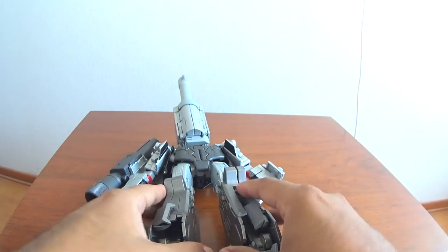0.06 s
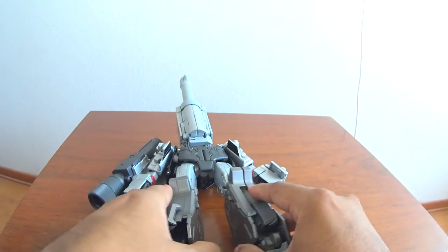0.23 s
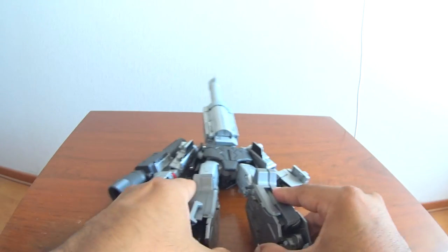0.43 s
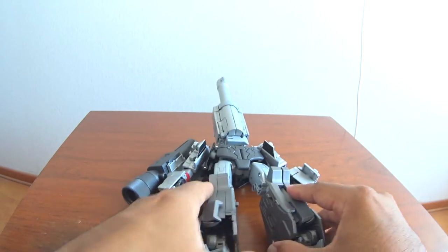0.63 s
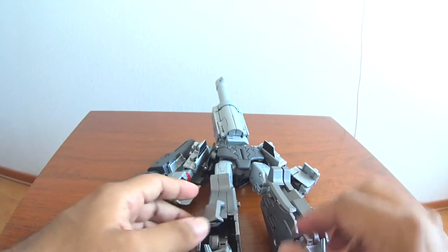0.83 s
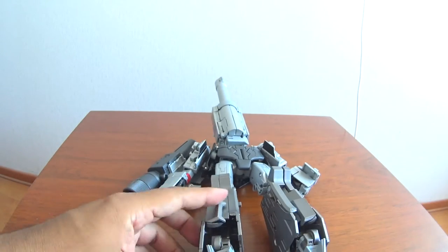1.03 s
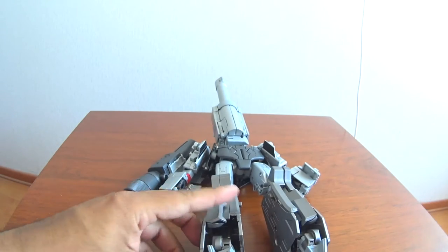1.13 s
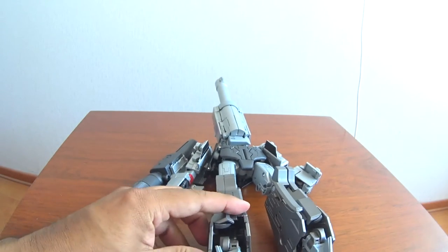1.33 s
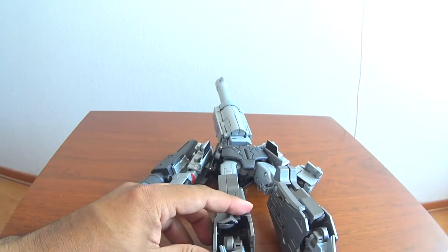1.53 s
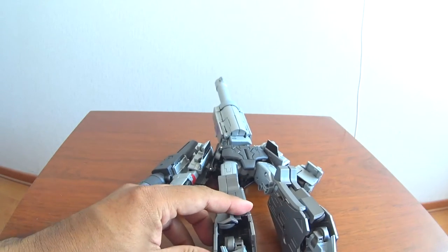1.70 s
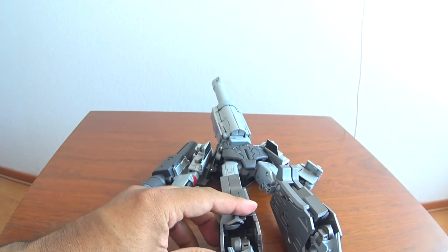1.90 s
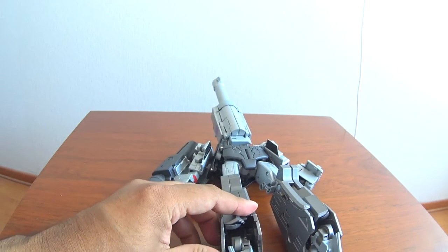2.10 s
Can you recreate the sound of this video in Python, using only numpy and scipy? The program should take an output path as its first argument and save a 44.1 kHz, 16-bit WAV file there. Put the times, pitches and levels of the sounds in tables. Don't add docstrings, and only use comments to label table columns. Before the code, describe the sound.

Hard plastic toy handled on a wooden table, heard close in stereo in a small room. A soft thump and scrape open; from 0.2 to 0.5 seconds bright snaps crowd together, with a loud hollow clack near 0.4 and grainy rubbing. Faint taps follow around 0.6, then near quiet. Crisp folding clicks and table thumps come at 1.2-1.5, sparser ones at 1.7-2.1, over faint hum and hiss.

```python
import sys
import numpy as np
from scipy import signal
from scipy.fft import rfft, irfft
from scipy.io import wavfile

SR = 44100
rng = np.random.default_rng(int(sys.argv[2]) if len(sys.argv) > 2 else 0)


def undo_db(level):
    steps = np.asarray(level, float) / 20
    return 10 ** steps


def inscribe(sig):
    pcm = np.round(np.clip(np.atleast_2d(sig).T, -1, 1) * 32767)
    wavfile.write(sys.argv[1], SR, pcm.astype(np.int16))


N = 94815


def level(x, db):
    return x * undo_db(db) / np.sqrt(np.mean(x ** 2))


def curve(rows):
    times, db = np.array(rows).T
    return undo_db(np.interp(np.arange(N) / SR, times, db))


def plastic(modes, cycles, detune):
    hz, db = np.array(modes).T
    shifted = hz * (1 + detune * rng.standard_normal(len(hz)))
    return np.array([shifted, db, cycles / hz]).T


def lean(modes, centre_hz, octaves):
    distance = np.log2(np.array(modes)[:, 0] / centre_hz)
    return -6 * (distance / octaves) ** 2


def ring(modes, gains_db, size):
    hz, db, t60 = np.array(modes).T[:, :, None]
    t = np.arange(size) / SR
    strength = undo_db(db + np.reshape(gains_db, (-1, 1)))
    decay = np.exp(-np.log(1000) * t / t60)
    return np.sum(strength * np.sin(2 * np.pi * hz * t) * decay, axis=0)


def grains(count, spread_db):
    return rng.standard_normal(count) * undo_db(spread_db * rng.exponential(size=count))


def hit(modes, centre_hz, octaves, chatter_ms, size, rattle_db=-120, blow_db=-120):
    gains = lean(modes, centre_hz, octaves)
    ms = np.arange(size) / SR * 1000
    rattle = undo_db(rattle_db) * np.exp(-ms / 34.5)
    shape = np.exp(-ms / max(chatter_ms, 0.1)) + rattle
    rise = 1 - np.exp(-ms / 0.3)
    push = grains(size, 2.0) * shape * rise
    push[0] = -undo_db(blow_db)
    scatter = 1.5 * rng.standard_normal(len(modes))
    direct = signal.fftconvolve(push, ring(modes, gains + scatter, size=2048))[:size]
    around = ring(modes * [1, 1, 0.5], gains, size)
    same_energy = np.sqrt(np.sum(direct ** 2) / np.sum(around ** 2))
    return np.array([direct, around * same_energy])


def add(track, at_s, sound, peak_db):
    i = int(at_s * SR)
    scaled = sound * undo_db(peak_db) / np.abs(sound[0]).max()
    track[:, i:i + sound.shape[1]] += scaled[:, :N - i]


def highpass(x, order, cut_hz):
    return signal.sosfilt(signal.butter(order, cut_hz, "highpass", fs=SR, output="sos"), x)


SNAP_OCTAVES, SNAP_CUT_HZ, SHELL_CYCLES = 0.9, 1250, 20

# (frequency [Hz], level [dB])
SHELL_MODES = [(1450, -42), (1940, 3.5), (2400, -61), (2850, 4), (3700, 5), (4400, 5.5), (5100, 2),
               (5700, 8.5), (6500, 3.5), (7250, 14), (7900, 15.5), (8600, -34), (9600, -52), (10650, 13)]
# (time [s], peak
# level [dB], colour centre [Hz], chatter [ms])
SHELL_SNAPS = [(0.2093, -27.5, 5840, 1.6), (0.2163, -35, 3900, 2), (0.2259, -24.5, 6400, 1),
               (0.2325, -20, 7100, 2.4), (0.2333, -19, 5000, 0.34), (0.299, -45, 8000, 2.3),
               (0.3078, -18, 5070, 2.8), (0.3365, -16.5, 6040, 5.4), (0.3401, -22, 7000, 2),
               (0.366, -28, 5970, 1.1), (0.3693, -22, 5840, 7.6), (0.378, -19, 7000, 1.6),
               (.3860, -18.5, 6350, 0.63), (0.394, -23.5, 7000, 4.4), (0.402, -26, 7000, 1.6),
               (0.4052, -18, 5000, 2.2), (.4550, -33, 7000, 1.3),
               (1.215, -46, 5000, 4.4), (1.2214, -35.5, 4070, 3.4), (1.2276, -23.5, 8200, 2.2),
                 (1.2323, -34.5, 4530, 1.1), (1.2486, -20.5, 7200, 1.9), (1.3568, -31.5, 5240, 1.9),
                 (1.3810, -30, 4300, 3.6), (1.4283, -26.5, 3548, 2.7), (1.679, -44, 3500, 1.3),
                 (1.7320, -28, 5400, 1.8), (1.814, -40.5, 3900, 9.4), (1.8266, -24, 7740, 2),
                 (1.9686, -39.5, 5000, 1.7), (2.016, -30.5, 5000, 2.5), (2.0535, -39.5, 3560, 1.8),
                 (2.0714, -39, 3500, 1.1), (2.1144, -27.5, 5840, 2.2)]


def snaps():
    out = np.zeros((2, N))
    for s, db, hz, chatter_ms in SHELL_SNAPS:
        shell = plastic(SHELL_MODES, SHELL_CYCLES, detune=0.025)
        add(out, s, hit(shell, hz, SNAP_OCTAVES, chatter_ms, size=2048, blow_db=4), db)
    return highpass(out, 3, SNAP_CUT_HZ)


# (time [s], peak level [dB], panel
# tone [Hz], chatter [ms])
PANEL_TAPS = [(0.043, -49.5, 8300, 6), (0.1226, -43, 2000, 2.65), (0.228, -30.5, 2720, 5.9),
              (.308, -31, 1950, 1.5), (.3078, -27, 5000, 1.5), (0.563, -42, 3440, 5.9),
              (.6365, -39.5, 3700, 2.5), (0.68, -42, 7800, 1.2), (.683, -37, 2060, 2.8),
              (.698, -42, 2770, 0.36), (0.935, -55.5, 8000, 3.6), (1.07, -51, 6600, 2.5),
              (1.2495, -38, 1880, 1.8), (1.2490, -22, 6200, 1.6), (1.431, -29.5, 3370, 2.6),
              (1.736, -44.5, 4100, 1.24), (.210, -63, 2750, 2.5), (0.22, -36, 2800, 2.9),
              (0.4, -44, 4100, 1), (0.3, -35, 10600, 0.89), (.318, -44, 3800, 0.76), (0.57, -53, 2300, 3.2),
              (0.52, -53, 2300, 2), (.625, -41, 4200, 2), (0.63, -47, 3330, 2.2), (1.223, -37.5, 4300, 1.4),
              (1.430, -33, 1440, 4.1), (1.4, -35, 1600, 2.3), (1.452, -43, 4200, 2),
              (1.827, -40, 3100, 1.3), (1.8265, -35.5, 7200, 2.7), (1.836, -41, 6800, 2.4),
              (1.863, -46, 7300, 5.8), (1.972, -48, 1800, 2.86), (2.019, -44, 1710, 2.9),
              (2.0175, -31.5, 5300, 0.88), (2.056, -41.5, 2900, 4), (1.2285, -27, 13000, 1.8),
              (1.249, -38, 17000, 1.3), (1.237, -36, 12000, 1.5), (1.737, -41.5, 2300, 3.7),
              (0.29, -38, 7200, 2), (.2258, -28.5, 5800, 1.5)]


def taps():
    out = np.zeros((2, N))
    for s, db, hz, chatter_ms in PANEL_TAPS:
        panel = plastic([(hz, 0), (hz * 1.17, -3)], SHELL_CYCLES, detune=0)
        add(out, s, hit(panel, hz, SNAP_OCTAVES, chatter_ms, size=2048), db)
    return highpass(out, 3, SNAP_CUT_HZ)


BODY_CYCLES = 19.7

# (frequency [Hz], level [dB])
BODY_MODES = [(376, -33), (460, 1.5), (580, 6), (710, 4.5), (820, 14.5), (976, -2.5), (1025, 9), (1225, 10),
              (1420, 12.5), (1750, 0), (1980, 15.5), (2800, 10)]
# (frequency [Hz], level [dB], t60 [s])
TABLE_MODES = [(62, -45, 0.9), (95.4, -12.5, 1), (119.87, -12.5, 0.63), (176.1, 2, 0.18), (221.8, -4, 0.37),
               (235.7, -3.5, 0.42), (283, -20, 0.26), (348, -15, 0.1)]
# (time [s], body peak [dB], body centre [Hz], table thump peak [dB], thump centre [Hz])
TABLE_KNOCKS = [(0.034, -63, 700, -34, 90), (0.237, -39.5, 890, -29.5, 178), (0.265, -64, 600, -35.5, 182),
                (0.336, -62, 900, -28, 188), (0.3892, -11.5, 1510, -32, 235), (0.406, -30, 840, -31.5, 200),
                (.420, -19, 970, -59, 235), (0.4389, -19.5, 1120, -27.5, 235),
                (0.4471, -30.5, 1430, -26, 235), (0.46, -27, 1300, -31, 235), (.472, -30.5, 900, -30, 235),
                (0.646, -45, 695, -37, 222), (1.237, -35, 699.4, -33.5, 174), (1.407, -44, 600, -36, 210),
                (1.432, -33, 716, -17.5, 165), (1.481, -35, 1050, -51, 200),
                (1.817, -35.5, 425, -25.5, 165), (1.943, -47.5, 530, -40, 200), (2.025, -54, 700, -39, 232)]


def knocks():
    body, table = np.zeros((2, N)), np.zeros((1, N))
    t = np.arange(512) / SR * 1000
    thump_push = t * np.exp(-t)
    for s, db, hz, thump_db, thump_hz in TABLE_KNOCKS:
        modes = plastic(BODY_MODES, BODY_CYCLES, detune=0.005)
        blow = hit(modes, hz, 1.2, 0.23, size=8192, rattle_db=-12.5, blow_db=21)
        blow = signal.lfilter(*signal.butter(2, hz * 3.6, fs=SR), blow)
        add(body, s, blow, db)
        top = ring(TABLE_MODES, lean(TABLE_MODES, thump_hz, 0.63), size=16384)
        add(table, s, signal.fftconvolve(thump_push, top)[None], thump_db)
    return body, highpass(table, 4, 106.4)


# (time [s], peak level [dB], frequency [Hz], t60 [s])
HOLLOW_TONES = [(.391, -34, 1030, 0.12), (0.391, -34, 1410, 0.052), (.408, -37.5, 817, 0.27),
                (0.425, -36.5, 1050, 0.054), (0.439, -36, 987, 0.18), (.441, -35.5, 712, 0.14),
                (.448, -36, 1384, 0.06), (.459, -41.5, 2000, 0.027), (.470, -42.5, 821, 0.17),
                (1.431, -41, 683, 0.046), (1.436, -44.5, 803, 0.11), (1.436, -43, 345, 0.15),
                (1.480, -46, 580, 0.057), (1.480, -53, 1146, 0.043), (1.820, -40.5, 352, 0.096),
                (1.827, -49.5, 1300, .12), (1.945, -50, 632, 0.061)]


def tones():
    out = np.zeros((2, N))
    ms = np.arange(8192) / SR * 1000
    rise = 1 - np.exp(-ms / 0.84)
    for s, db, hz, t60 in HOLLOW_TONES:
        tone = ring([(hz, 0, t60)], 0, size=8192) * rise
        add(out, s, np.tile(tone, (2, 1)), db)
    return out


def rubbed(modes, control, db, gains_db=0):
    response = ring(modes, gains_db, size=16384)
    response = response / np.sqrt(np.sum(response ** 2))
    force = level(grains(N, 3), db) * curve(control)
    return signal.fftconvolve(force, response)[:N]


# (time [s], level [dB])
DRAG_LEVEL = [(0.0, -47.5), (.1, -60.5), (.18, -45.5), (.3, -42.5), (0.47, -35), (.58, -52.5), (.68, -42.5),
              (0.8, -69), (1.1, -60.5), (1.25, -51.5), (1.6, -59), (1.75, -58), (1.9, -55.5), (2.15, -52.5)]
# (time [s], level [dB])
RUB_LEVEL = [(0, -57), (.18, -59.5), (.3, -49), (.40, -36), (.5, -49.5), (.56, -50.5), (.64, -46.5),
             (.70, -56.5), (.76, -83), (1.04, -55.5), (1.12, -97), (1.2, -60), (1.36, -60), (1.42, -51.5),
             (1.55, -82), (2.05, -57), (2.15, -71)]


def handling():
    table_shake = rubbed(TABLE_MODES, DRAG_LEVEL, -0.5)
    body_shake = rubbed(plastic(BODY_MODES, BODY_CYCLES, 0), DRAG_LEVEL, -14.5)
    shell = plastic(SHELL_MODES, SHELL_CYCLES, 0)
    fingers = rubbed(shell, RUB_LEVEL, -7, lean(shell, 3500, 0.74))
    return table_shake, body_shake + fingers


ROOM_DB, ROOM_GAP_MS = -12.5, 7.1
ROOM_ALIKE = 0.64

# (band centre [Hz], level [dB], t60 [s])
ROOM_BANDS = [(283, 11, 0.29), (600, 1, 0.73), (1090, 1, 0.53), (2000, 11.5, 0.25), (3500, 4, 0.32),
              (5000, -4.5, 0.19), (7000, 0, 0.36), (9200, -8, 0.23)]


def room(x):
    t = np.arange(SR // 2) / SR
    tail = np.zeros((2, len(t)))
    for hz, db, t60 in ROOM_BANDS:
        band = signal.butter(2, [hz / 1.51, hz * 1.383], "bandpass", fs=SR, output="sos")
        noise = signal.sosfilt(band, rng.standard_normal((2, len(t))))
        tail += noise * undo_db(db) * np.exp(-np.log(1000) * t / t60)
    middle = tail[0]
    side = tail[1] * np.sqrt((1 - ROOM_ALIKE) / (1 + ROOM_ALIKE))
    build_up = np.clip(t * 1000 / ROOM_GAP_MS, 0, 1) ** 2
    tail = np.array([middle + side, middle - side]) * build_up
    tail = tail * undo_db(ROOM_DB) / np.sqrt(np.sum(tail ** 2) / 2)
    return signal.fftconvolve(x[None], tail, axes=1)[:, :N]


def hum():
    return undo_db(-67) * np.sqrt(2) * np.sin(2 * np.pi * 120.6 * np.arange(N) / SR)


def coloured(points, db):
    hz = np.maximum(np.arange(N // 2 + 1) * SR / N, 1)
    point_hz, point_db = np.array(points).T
    gain = undo_db(np.interp(np.log(hz), np.log(point_hz), point_db))
    return level(irfft(rfft(rng.standard_normal(N)) * gain, N), db)


APART = np.array([[1], [-1]])

# (frequency [Hz], level [dB per Hz])
AIR_MIDDLE = [(15, -6.5), (25, 1.5), (124, 4.5), (480, -13.5), (573, -13), (668, -16.5), (1060, -18),
              (4070, -26.5), (11000, -37), (14300, -68), (22000, -120)]
# (frequency [Hz], level [dB per Hz])
AIR_APART = [(15, -68), (25, -24), (165, -13), (247, -12), (353, -9.5), (422, -9.5), (1170, -11),
             (11000, -38.5), (14300, -75), (22000, -120)]


def air():
    return coloured(AIR_MIDDLE, -53) + APART * coloured(AIR_APART, -60)


def scene():
    body, table = knocks()
    shake, rustle = handling()
    toy, around = snaps() + taps() + body + tones() + rustle
    near = toy + APART * undo_db(-15.5) * np.gradient(toy)
    low_body = signal.lfilter(*signal.iirpeak(510, 1.8, fs=SR), body[0] + tones_direct(body))
    near = near - APART * undo_db(-9.5) * low_body
    return near + room(around) + table + shake + hum() + air()


def tones_direct(body):
    return tones()[0]


def top_cut(x):
    return signal.sosfilt(signal.butter(12, 12370, fs=SR, output="sos"), x)


def record(dry):
    dip = signal.lfilter(*signal.iirpeak(8940, 3.2, fs=SR), dry)
    mix = highpass(dry - 0.31 * dip, 3, 56)
    mix = signal.sosfilt(signal.ellip(7, 0.5, 37, 11000, fs=SR, output="sos"), mix)
    return top_cut(mix)


dry = scene()
out = record(dry)
inscribe(out)
```